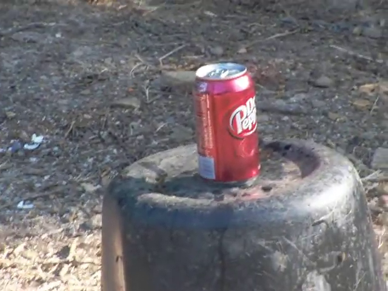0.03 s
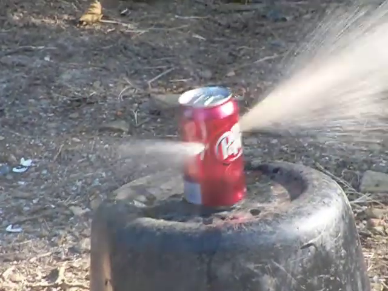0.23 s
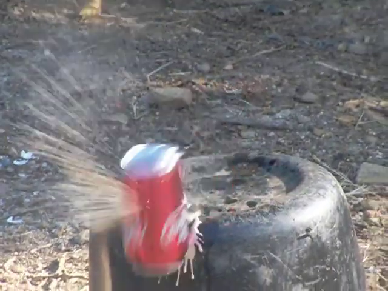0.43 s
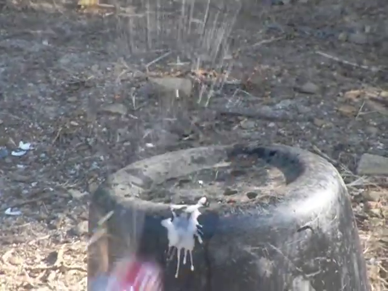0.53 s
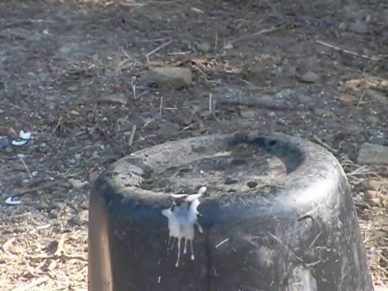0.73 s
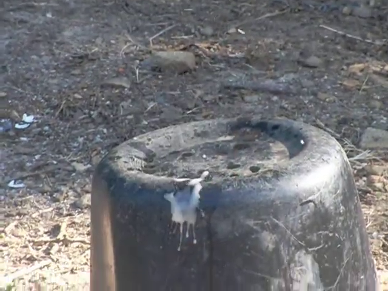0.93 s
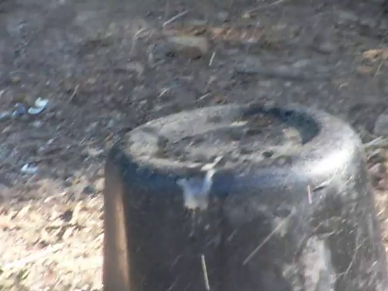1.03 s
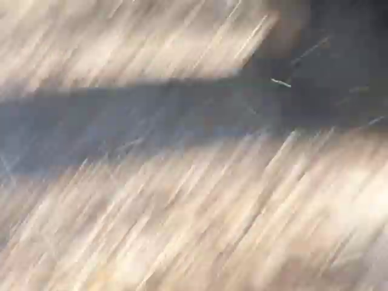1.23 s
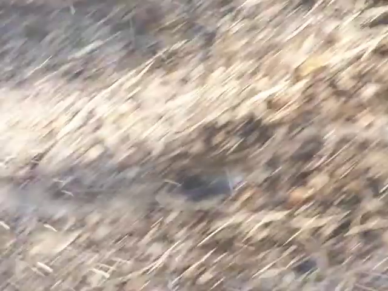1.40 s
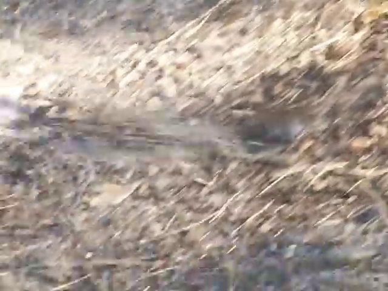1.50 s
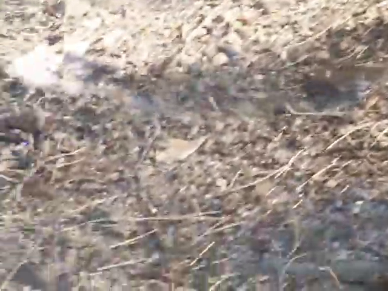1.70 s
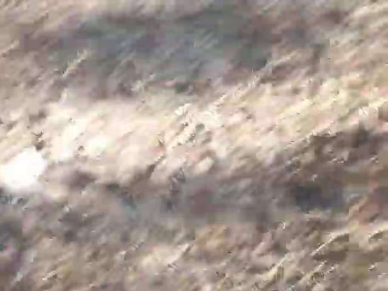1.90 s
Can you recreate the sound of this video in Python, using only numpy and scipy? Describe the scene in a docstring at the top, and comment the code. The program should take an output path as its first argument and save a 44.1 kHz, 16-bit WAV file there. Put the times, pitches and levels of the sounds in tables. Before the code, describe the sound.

An air rifle clacks and puffs at 0.2 seconds, and at once its pellet bursts a soda can with a ringing pop and brief whine. Around 0.4 seconds the can knocks and scrapes off a plastic tub. Dry litter crackles as it bumps the ground at 0.7 and 0.9 seconds, spurting. Spray hisses on until about 2 seconds, swishing at 1.6, over light wind and soft handling bumps.

```python
"""Outdoors, in light wind, an air rifle clacks and puffs. Its pellet punctures a full can of soda
on an upturned plastic tub: the can rings, hums, whines and starts to hiss. It tips over, knocks
the tub and scrapes off it. Dry litter crackles as the can bumps on the ground and spurts.
The spray hisses on to the end, while a few soft handling bumps reach the microphone."""
import sys
import numpy as np
from scipy import signal
from scipy.fft import rfft, irfft, next_fast_len
from scipy.io import wavfile
from scipy.ndimage import map_coordinates

SR = 44100
rng = np.random.default_rng(int(sys.argv[2]) if len(sys.argv) > 2 else 0)


def store_pcm(level_fs):
    """Save levels as 16-bit WAV."""
    pcm = np.round(np.clip(level_fs, -1, 1) * 32767).astype(np.int16)
    wavfile.write(sys.argv[1], SR, np.atleast_2d(pcm).T)


N = 85995


def amp(db):
    """Turn decibels into a gain to multiply by."""
    return 10 ** (np.asarray(db) / 20)


def unit(x):
    """Scale a sound to an average (rms) strength of 1."""
    return x / np.sqrt(np.mean(x ** 2) + 1e-20)


def since(start):
    """Seconds since the start time at every sample, zero before it."""
    return np.maximum(np.arange(N) / SR - start, 0)


def along(points, hz):
    """Read between (frequency [Hz], value) points, spaced as the ear hears pitch."""
    freqs, values = np.transpose(points)
    return np.interp(np.log(hz + 1), np.log(freqs + 1), values)


def curves(rows):
    """Join timed points with straight lines: one curve for each column after the time."""
    times, *columns = np.transpose(rows)
    return [np.interp(since(0), times, column) for column in columns]


def wobble(rate):
    """A smooth curve through `rate` random points a second."""
    return map_coordinates(rng.standard_normal(int(N * rate / SR) + 4), [since(0) * rate])


def filtered(x, response):
    """Turn each frequency of x up or down by the gain response(hz)."""
    size = next_fast_len(N + SR // 2)
    return irfft(rfft(x, size) * response(np.fft.rfftfreq(size, 1 / SR)), size)[:N]


def noise(tone):
    """Steady noise of strength 1, shaped by (frequency [Hz], level [dB]) points."""
    return unit(filtered(rng.standard_normal(N), lambda hz: amp(along(tone, hz))))


def burst(tone, start, db, hold, fade):
    """A rush of noise that starts at once, holds, then drops 60 dB in `fade` seconds."""
    return noise(tone) * (1 - np.exp(-since(start) / 0.00024)) * amp(db - 60 * since(start + hold) / fade)


def ring(start, db, hz, fade, attack=0.00015):
    """One pure note of a struck object, dropping 60 dB in `fade` seconds."""
    t = since(start)
    return np.sin(2 * np.pi * hz * t) * (1 - np.exp(-t / attack)) * amp(db - 60 * t / fade)


def strike(notes, start, db):
    """A blow sets all the notes of an object ringing almost together."""
    return sum(ring(start + rng.uniform(0, 0.00099), db + level, hz, fade) for hz, level, fade in notes)


def wind():
    """A background rumble with light wind; it drops at the shot and comes back up near the end."""
    # level of the background rumble (time [s], level [dB])
    rumble_level = [(0, -49.5), (.2, -50), (.3, -56), (.7, -54), (1.0, -55.5), (1.55, -55.5), (1.75, -51.5),
                    (1.95, -48)]
    # its deep sound (frequency [Hz], level [dB])
    tone = [(15, 0.5), (30, 2), (65, -1.5), (110, -6.5), (170, -12.5), (250, -14), (370, -19.5), (900, -24),
            (2000, -27.5), (7000, -38.5), (9000, -52)]
    level_db, = curves(rumble_level)
    gust_db = 2.5 * wobble(7.85)
    return amp(level_db + gust_db) * noise(tone)


def handling():
    """Handling bumps reach the microphone as soft thumps."""
    # the bumps (time [s], level [dB], fade [s])
    bumps = [(0.976, -47.5, 0.073), (1.253, -44, 0.075), (1.376, -44.5, 0.055)]
    # their dull sound (frequency [Hz], level [dB])
    tone = [(30, -4.5), (90, -2), (180, 4), (290, -8), (450, -27), (1500, -51), (5000, -72)]
    return sum(burst(tone, start, db, hold=0.0033, fade=fade) for start, db, fade in bumps)


def yard_echo(x):
    """The ground and trees scatter a sound back as a short echo."""
    # how long the echo lasts (frequency [Hz], fade [s])
    fades = [(200, 0.34), (2000, 0.47), (8000, 0.3)]
    hz, t, bands = signal.stft(rng.standard_normal(SR // 2), SR, nperseg=256)
    _, tail = signal.istft(bands * amp(-60 * t / along(fades, hz)[:, None]), SR, nperseg=256)
    return signal.fftconvolve(x, tail / np.linalg.norm(tail))[:N]


def litter():
    """Dry litter crackles: each crackle is a tight cluster of tiny, unevenly spaced snaps."""
    # the crackles (time [s], level [dB], length [s], middle frequency [Hz])
    crackles = [(0.5206, -39.5, 0.0015, 3770), (.528, -42, .002, 4250), (.533, -41, 0.0016, 4420),
                (.538, -39.5, 0.0026, 3640), (.545, -37.5, 0.0015, 4660), (.5577, -48, .002, 4200),
                (0.5654, -34.5, 0.0026, 5300), (0.5712, -39, 0.0029, 4900), (0.575, -38.5, .006, 3680),
                (.588, -42.5, .012, 5300), (0.604, -36, .002, 5940), (0.704, -33, 0.0039, 5450),
                (0.733, -44.5, 0.0022, 5270), (.737, -37.5, 0.0021, 5250), (0.743, -38, 0.0021, 5260),
                (0.747, -34.5, 0.0062, 5940), (0.7957, -40.5, 0.0018, 5370), (0.8036, -38, 0.0038, 5670),
                (0.9006, -36, 0.0022, 5000), (0.9285, -36.5, 0.0022, 5400), (.939, -40.5, 0.0019, 5500),
                (0.9505, -38, 0.0028, 4600), (1.0952, -38, 0.0011, 6300), (1.112, -40.5, 0.00072, 4560),
                (1.166, -37.5, 0.00088, 3900)]
    snaps_per_s, snap_s, fade_cycles = 5000, 0.0005, 3
    out, t = np.zeros(N + SR), np.arange(SR // 25) / SR
    for start, db, length, hz in crackles:
        count = int(length * snaps_per_s) + 2
        scatter, pitch, size = rng.standard_normal((3, count, 1))
        onsets = length * (np.arange(count)[:, None] + scatter % 1) / count
        cycles = np.maximum(t - onsets, 0) * hz * np.exp(0.28 * pitch)
        snaps = np.sign(size) * amp(2 * size - 60 * cycles / fade_cycles) * np.sin(2 * np.pi * cycles)
        band = signal.butter(2, [0.61 * hz, min(1.73 * hz, 7800)], 'band', fs=SR, output='sos')
        crackle = signal.sosfilt(band, snaps.sum(axis=0))
        crackle *= np.sqrt((length + snap_s) * SR / np.sum(crackle ** 2))  # strength near 1
        out[round(start * SR):][:len(t)] += amp(db) * crackle
    return out[:N]


def spray():
    """The jet of soda hisses, its droplets patter, and it sweeps past as the can turns."""
    # level of the jet's hiss (time [s], level [dB])
    hiss_level = [(.25, -71), (.33, -48), (.41, -58.5), (.51, -59.5), (.57, -52.5), (.645, -44),
                  (.69, -50.5), (.78, -50), (.855, -47.5), (.89, -40), (.915, -47.5), (.945, -40.5),
                  (1.0, -49), (1.12, -49), (1.21, -52), (1.28, -49.5), (1.33, -56.5), (1.46, -52.5),
                  (1.57, -46.5), (1.66, -49.5), (1.73, -54), (1.83, -48), (1.95, -49.5)]
    # its bright sound (frequency [Hz], level [dB])
    hiss_tone = [(300, -40.5), (1000, -10.5), (1600, -13.5), (2500, -6), (4000, 0.5), (5500, 2),
                 (7200, 4.5), (7900, -9), (9000, -18)]
    # moments when the jet sweeps past (time [s], level [dB], rise [s], fall [s])
    passes = [(1.40, -50, 0.082, 0.058), (1.616, -36.5, 0.013, 0.021), (1.668, -50, .015, 0.019)]
    # the swish of a pass (frequency [Hz], level [dB])
    swish_tone = [(300, -14), (1800, -17.5), (2600, -8.5), (3700, -1.5), (4800, 2.5), (6500, -6.5),
                  (9000, -24.5)]
    drops_per_s, drop_spread_db, drop_share = 1800, 5.5, 0.35
    clicks = (rng.random(N) < drops_per_s / SR) * rng.choice([-1, 1], N)
    sizes = amp(drop_spread_db * np.minimum(rng.exponential(size=N), 4))
    drops = unit(filtered(clicks * sizes, lambda hz: amp(along(hiss_tone, hz))))
    level_db, = curves(hiss_level)
    flicker_db = 0.96 * wobble(49.83)
    jet = np.sqrt(1 - drop_share) * noise(hiss_tone) + np.sqrt(drop_share) * drops
    t = since(0)
    swells = sum(amp(db) * np.exp(np.minimum((t - peak) / rise, (peak - t) / fall))
                 for peak, db, rise, fall in passes)
    return amp(level_db + flicker_db) * jet + swells * noise(swish_tone)


def sputter():
    """The jet spurts roughly, and a lower, throaty hiss swells as the can turns."""
    # the spurts (time [s], level [dB], hold [s], fade [s])
    spurts = [(0.8144, -35, 0.0061, .01), (0.8214, -30, 0.0052, 0.021), (0.8321, -30.5, 0.0036, 0.034),
              (0.847, -39.5, .002, 0.016)]
    # their sharp sound (frequency [Hz], level [dB])
    spurt_tone = [(500, -26.5), (2600, -19.5), (3300, -5), (4300, 1.5), (5600, 3.5), (6500, -6),
                  (9000, -24)]
    # level of the throaty hiss (time [s], level [dB])
    throat_level = [(.4, -77.5), (.58, -57), (.68, -64), (.84, -80), (.89, -61), (.97, -49), (1.05, -66),
                    (1.2, -71), (1.28, -56.5), (1.35, -61.5), (1.45, -55.5), (1.52, -57), (1.57, -79),
                    (1.7, -78), (1.76, -61.5), (1.95, -65.5)]
    # its sound (frequency [Hz], level [dB])
    throat_tone = [(800, -23), (1600, -6.5), (2300, -1), (2900, -3.5), (4000, -7), (8000, -28.5)]
    spurting = sum(burst(spurt_tone, *spurt) for spurt in spurts)
    roughness = unit(amp(1.5 * wobble(1300)))
    throat_db, = curves(throat_level)
    return spurting * roughness + amp(throat_db + 2.0 * wobble(200)) * noise(throat_tone)


def can_on_ground():
    """The can knocks on the ground with a clank, and its body rings."""
    # the knocks (time [s], level [dB], pitch [Hz], fade [s])
    knocks = [(0.7046, -32.5, 1775, 0.017), (0.8879, -34, 1020, 0.0074)]
    # the noise of a knock (frequency [times the pitch], level [dB])
    shape = [(.1, -25.5), (.4, -21), (.6, -13), (.8, -18.5), (1, 3.5), (1.22, -18), (1.42, 0), (2, -14.5),
             (6, -30)]
    # notes of the can's body (frequency [Hz], level [dB], fade [s])
    body_notes = [(255.4, -17, 0.098), (709, -20.5, 0.095), (894, -18, 0.07)]
    out = np.zeros(N)
    for start, db, hz, fade in knocks:
        tone = [(hz * multiple, level) for multiple, level in shape]
        clank = ring(start, db + 3.5, hz, fade)
        out += burst(tone, start, db, hold=0.0011, fade=fade) + clank + strike(body_notes, start, db)
    return out


def can_on_tub():
    """The can tips over: the hollow tub thuds, the rim rings, and the can scrapes off."""
    # the knock on the tub (frequency [Hz], level [dB])
    knock_tone = [(60, -7.5), (150, -5), (400, -14), (1000, -10), (2000, -11), (2700, -18), (3600, 5.5),
                  (5400, -9.5), (6200, 3), (7300, -3.5), (9000, -22.5)]
    # notes of the can's rim (frequency [Hz], level [dB], fade [s])
    rim_notes = [(3720, -6, 0.039), (4500, -13, 0.14), (5460, -15, .13), (6000, 2, 0.06), (7000, -1, 0.043),
                 (7200, 1.5, .06)]
    # the scrapes (time [s], level [dB], hold [s], fade [s])
    scrapes = [(0.434, -35, .006, .17), (0.4758, -38, .013, 0.022)]
    # their rasp (frequency [Hz], level [dB])
    scrape_tone = [(120, -12), (280, -5), (500, -20.5), (1300, -8.5), (1900, -11), (2550, 1), (3100, -10.5),
                   (3750, 4.5), (4400, -8.5), (5200, 6), (5750, -6), (6400, -2), (6900, -11), (7300, 3),
                   (7900, -15), (9000, -17)]
    start = 0.4276
    knock = burst(knock_tone, start, db=-24.5, hold=0.0019, fade=0.011)
    thud = ring(start, db=-29.5, hz=115, fade=0.028)
    scraping = sum(burst(scrape_tone, *scrape) for scrape in scrapes) * amp(1.8 * wobble(500))
    return knock + thud + strike(rim_notes, start, db=-30) + scraping


def rifle():
    """The rifle's steel parts clack, ring and rebound while air puffs from the barrel."""
    # the clacks (time [s], level [dB], hold [s], fade [s])
    clacks = [(0.2071, -24, 0.018, 0.034), (0.2277, -30.5, 0.0018, 0.11), (0.2385, -28, 0.0025, 0.11)]
    # their sharp sound (frequency [Hz], level [dB])
    clack_tone = [(60, -27), (500, -15), (1300, -13), (1900, -6.5), (2800, -3), (4000, -0.5), (5200, -1.5),
                  (6500, -6), (7600, -10.5), (9000, -33)]
    # notes of the steel (frequency [Hz], level [dB], fade [s])
    steel_notes = [(2880, -6, 0.062), (3390, -2, 0.12), (4000, 3, .11), (4600, 8, 0.056),
                   (5160, -5.5, 0.072)]
    # the escaping air (frequency [Hz], level [dB])
    puff_tone = [(25, 0.5), (100, 0.5), (250, -10.5), (480, 1.5), (650, -8.5), (900, -1.5), (1600, -13.5),
                 (4500, -11), (9000, -29.5)]
    clacking = sum(burst(clack_tone, start, db, hold, fade) + strike(steel_notes, start, db - 11.5)
                   for start, db, hold, fade in clacks)
    return clacking + burst(puff_tone, start=0.2138, db=-20.5, hold=0.0049, fade=0.026)


def whine(start):
    """A rough whine of two notes slides down after the pellet hits."""
    # path of the lower note (time [s], pitch [Hz], level [dB])
    slide = [(.285, 1060, -56), (.315, 1007, -44), (.335, 947, -49.5), (.355, 870, -55.5),
             (.385, 832, -70.5)]
    hz, db = curves(slide)
    end = slide[-1][0]
    phase = 2 * np.pi * np.cumsum(hz * (1 + 0.01 * wobble(150))) / SR
    notes = np.sin(phase) + amp(-5.5) * np.sin(1.18 * phase)
    fade_in_out = (1 - np.exp(-since(start) / 0.01)) * np.exp(-since(end) / 0.01)
    return fade_in_out * amp(db + 2.5 * wobble(120)) * notes


def puncture():
    """The pellet bursts the can: its wall rings, and the shaken can hums on the hollow tub."""
    # the pellet's first contact (frequency [Hz], level [dB])
    crack_tone = [(100, -18.5), (700, -7), (1200, 0.5), (1800, -0.5), (2400, 2.5), (3300, -12),
                  (5500, -13.5), (7200, -8.5), (9000, -35.5)]
    # the can bursting (frequency [Hz], level [dB])
    pop_tone = [(50, -22), (130, -20), (270, 3.5), (400, -10), (600, -20.5), (1000, -5), (1350, -3.5),
                (1800, -10.5), (2350, -0.5), (3900, -8.5), (4700, -1.5), (6700, 1), (7600, -8.5),
                (9000, -33.5)]
    # notes of the can's wall (frequency [Hz], level [dB], fade [s])
    wall_notes = [(1258, -11, 0.11), (2282, 7.5, 0.091), (2330, 5, 0.11), (2430, -7, 0.11), (2966, -6, .14),
                  (3095, -3, 0.16), (4360, -6, 0.052), (4680, -7.5, .12), (4690, -3, 0.17),
                  (5780, 0.5, 0.11), (6170, -11, .11), (6686, -2.5, .14), (6901, -13, 0.17)]
    # the low hums (time [s], level [dB], pitch [Hz], attack [s], fade [s])
    hums = [(0.2608, -23.5, 230.8, 0.0017, 0.17), (0.2591, -24, 187, .003, 0.081),
            (.364, -31.5, 205, 0.0083, .1)]
    start = 0.2597
    wall = strike(wall_notes, start, db=-29.5)
    crack = burst(crack_tone, start, db=-21.5, hold=0.0015, fade=0.015)
    pop = burst(pop_tone, start, db=-18, hold=0.0035, fade=0.12)
    hum = sum(ring(time, db, hz, fade, attack) for time, db, hz, attack, fade in hums)
    return crack + pop + wall + hum + whine(start)


def scene():
    """The shot, burst and tumble echo faintly in the yard, over spray and wind."""
    hits = rifle() + puncture() + can_on_tub() + can_on_ground() + litter()
    return (hits + amp(-16) * yard_echo(hits) + spray() + sputter() + wind() + handling())[None]


def record(dry):
    """Round off the loudest peaks and cut away the highest treble."""
    peak_limit, rolloff_hz, top_hz = 0.235, 8500, 9200
    rounded = dry[0] / (1 + np.abs(dry[0] / peak_limit) ** 4) ** (1 / 4)
    return filtered(rounded, lambda hz: (hz < top_hz) / np.sqrt(1 + (hz / rolloff_hz) ** 60))[None]


dry = scene()
out = record(dry)
store_pcm(out)
```